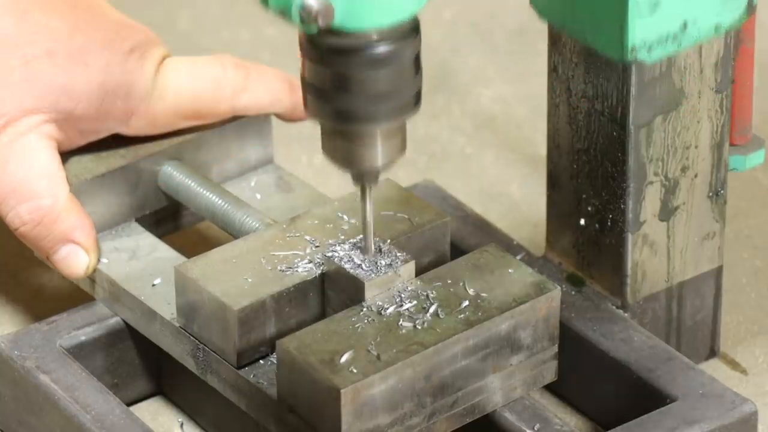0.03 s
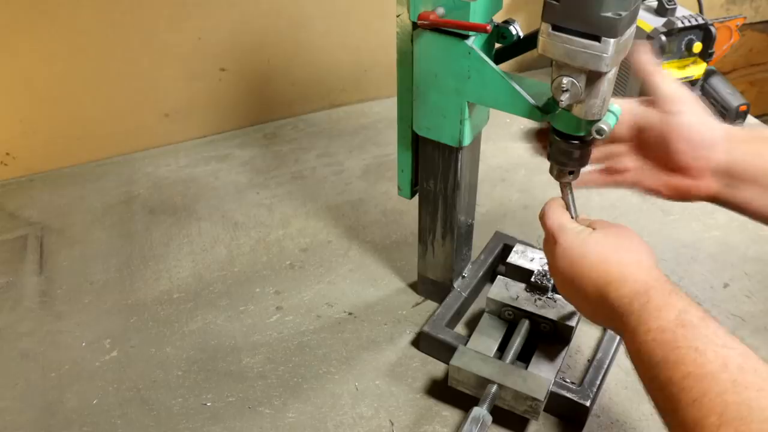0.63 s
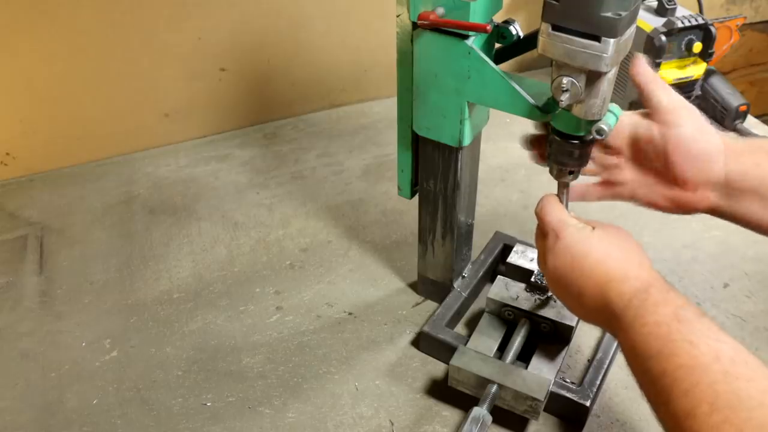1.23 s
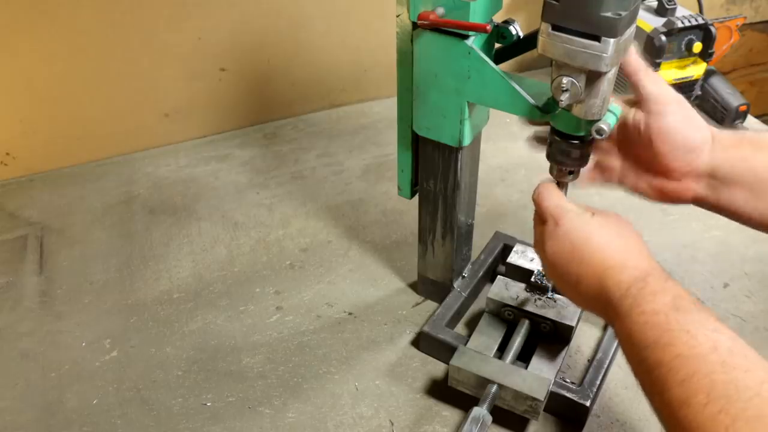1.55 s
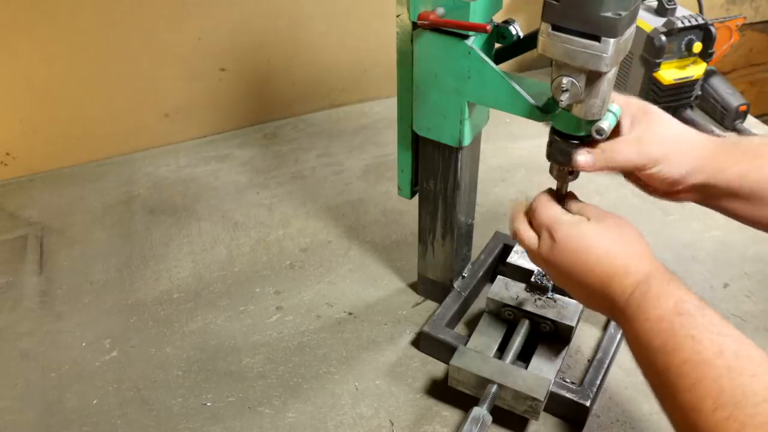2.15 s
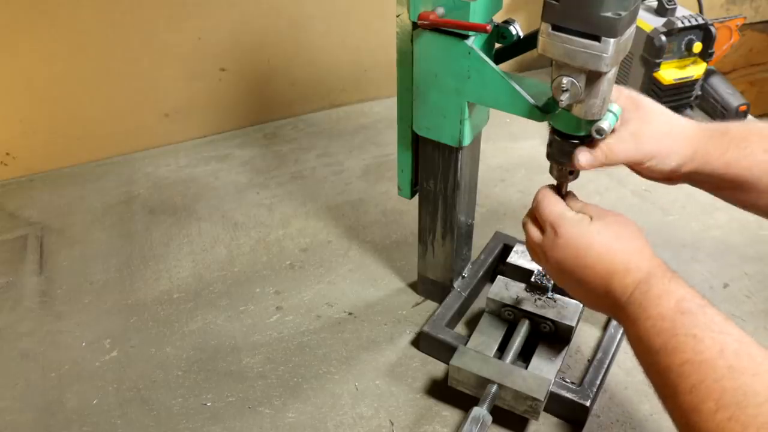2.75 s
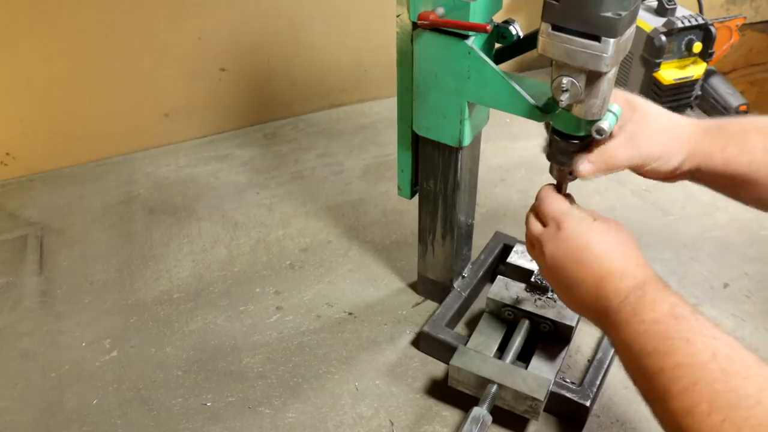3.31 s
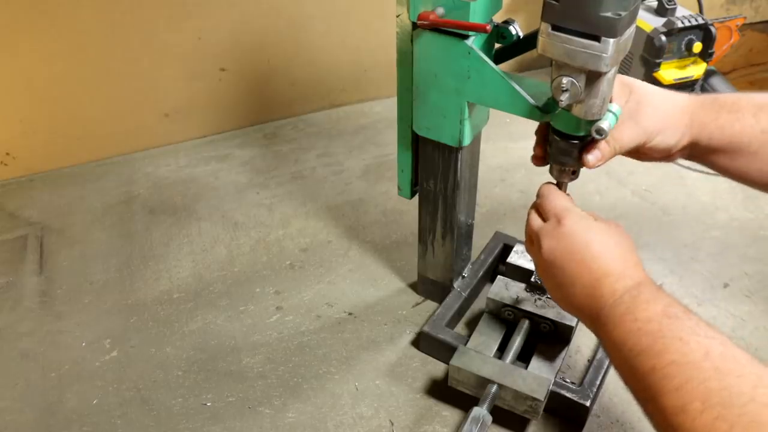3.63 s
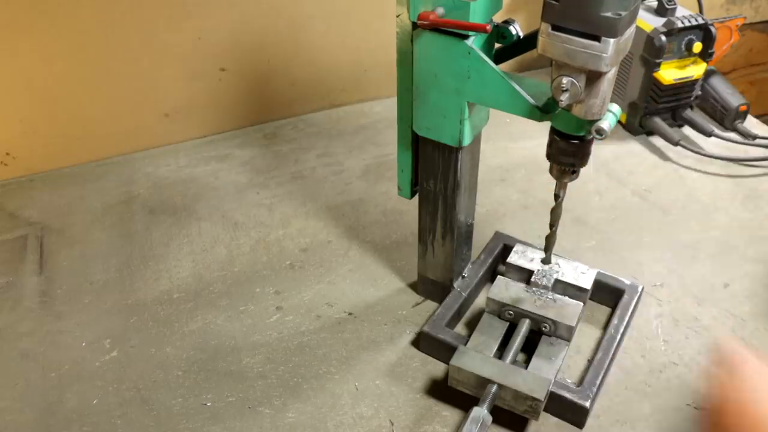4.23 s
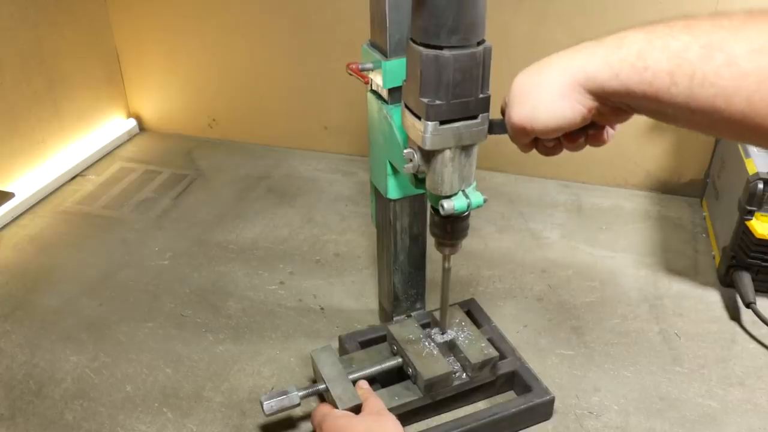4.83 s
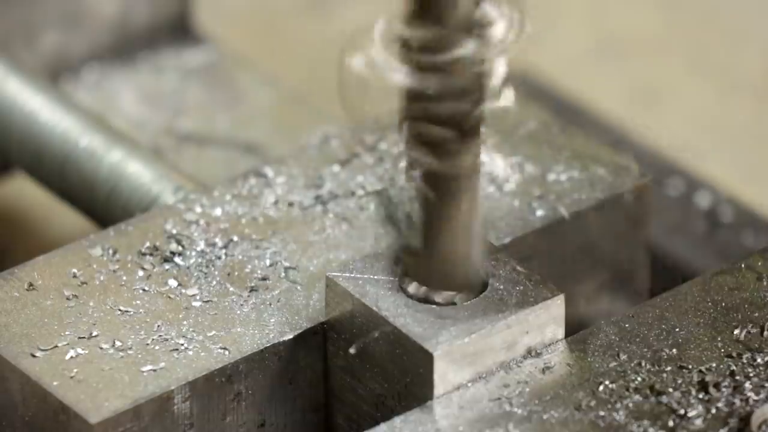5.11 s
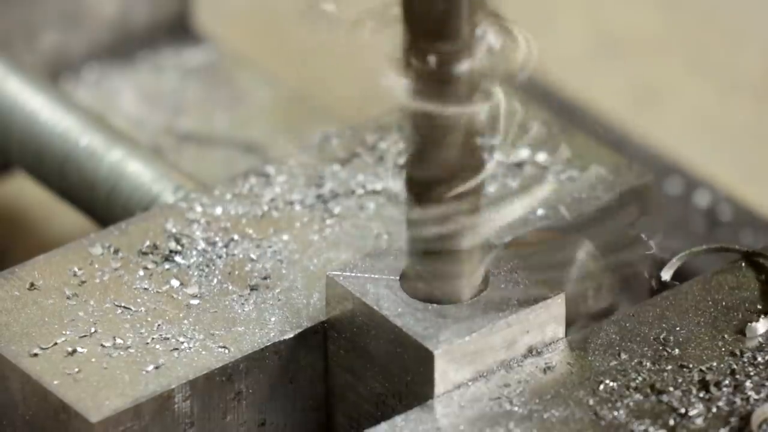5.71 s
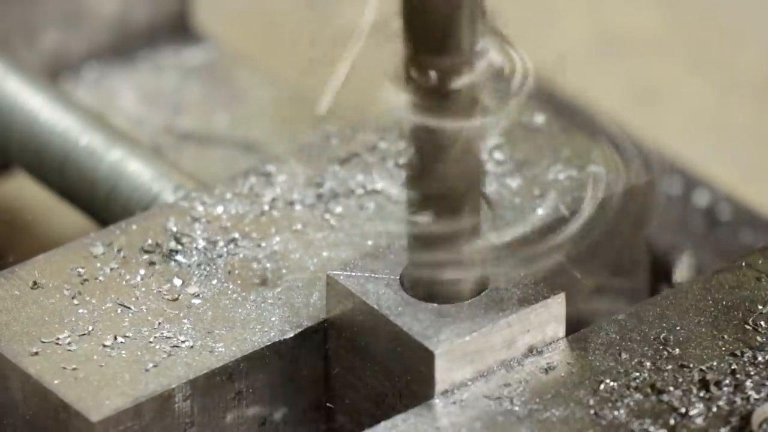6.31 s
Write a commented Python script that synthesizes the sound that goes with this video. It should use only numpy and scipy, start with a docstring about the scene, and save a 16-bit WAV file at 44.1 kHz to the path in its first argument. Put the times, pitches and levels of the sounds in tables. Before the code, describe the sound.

A short, raspy whine of an electric drill cutting metal gives way to a quieter stretch of scattered steel clicks, small pings and dull bumps as the chuck is tightened by hand. Then the motor is suddenly buzzing freely, and a moment later it labours in a deep cut, with a high wavering whine, a pulsing groan and grinding steel. The sound is close, in a small, fairly dry workshop.

```python
"""Gears whine, rising in pitch, as an electric drill in a steel stand runs a thin bit in a small workshop.
Three more scenes follow abruptly. With the motor off, hands tighten a thicker bit: the jaws click, and
their impacts ring chuck, bit and stand. The drill runs freely, its motor harmonics buzzing over the rush
of fan and gears. Then it labours in a deep cut: the whine flutters, the bit groans once a turn and sheds
chips, and the cutting edge drives the resonances of a block held in a vice."""
import sys
import numpy as np
from scipy import signal
from scipy.fft import rfft, irfft
from scipy.io import wavfile
from scipy.ndimage import uniform_filter1d, map_coordinates

SR = 44100
rng = np.random.default_rng(int(sys.argv[2]) if len(sys.argv) > 2 else 0)


def file_out(sig):
    """Save sig as 16-bit WAV at sys.argv[1]."""
    # one column per channel
    cols = np.atleast_2d(sig).T
    # limit, then scale
    lim = np.clip(cols, -1, 1)
    pcm = np.round(lim * 32767).astype(np.int16)
    wavfile.write(sys.argv[1], SR, pcm)


N = 284886
T = np.arange(N) / SR
THIN_SPAN_S, FREE_SPAN_S, DEEP_SPAN_S = (-0.1, 0.6465), (4.431, 5.126), (5.134, 6.6)
GEAR_RATIO = 9.7  # motor turns per turn of the gear wheel
ROOM_T60_S = 0.2
# modes of chuck and stand: (f/Hz, level/dB, t60/s)
CHUCK_MODES = [(935, 3, 0.2), (1020, 3, 0.27), (1136, 1, 0.2), (1637, 6, 0.067), (1715, 4, 0.21),
               (1972, 1.5, 0.34), (2030, -9, 0.26), (2226, -2.5, 0.2), (2470, -4, 0.077), (2900, -6, 0.2),
               (3300, -6, 0.099), (3990, 0, 0.15), (4035, 0, 0.13), (4740, -6, 0.11)]
# spectrum of the part that differs between left and right: (f/Hz, level/dB)
SIDE_SPECTRUM = [(60, -37), (200, -19), (400, -11), (1300, -4.5), (2400, -3.5), (4300, 0.5), (8000, 5),
                 (14000, -1)]


def thin_bit():
    """Resonance: as the motor gathers speed, its harmonics sweep through the modes of the case."""
    # motor harmonics: (order, level at resonance/dB, resonance f/Hz, half width/Hz)
    resonances = [(1, -52.5, 467, 44), (3, -50.5, 1360, 44), (5, -64, 2270, 68), (6, -45.5, 2620, 37),
                  (7, -47, 3160, 26), (8, -46, 3560, 37), (10, -59, 4420, 35), (12, -56.5, 5480, 54)]
    # rasp of gears, fan and cutting edge: (f/Hz, level/dB)
    rasp_spectrum = [(40, -15.5), (130, -12.5), (300, -10.5), (480, -7), (700, -8), (1300, -1.5),
                     (2600, -1), (3100, -5.5), (3700, -3.5), (5500, -10), (6600, -16), (9500, -21),
                     (11000, -23.5), (14000, -32)]
    start_hz, top_hz, spin_up_s = 432.3, 474.5, 0.67
    case_hz, half_width_hz = 1820, 22
    motor_hz = top_hz - (top_hz - start_hz) * np.exp(-T / spin_up_s)
    motor = turns(motor_hz * (1 + 0.0009 * walk(70)))
    second = amp(-42.5 + 0.87 * walk(41.2)) * np.sin(2 * motor)
    # the gears mesh four times a motor turn and sing at the resonance of the gear case
    mesh_gain = amp(-33) / np.hypot(1, (4 * motor_hz - case_hz) / half_width_hz)
    mesh = mesh_gain * amp(walk(46.7)) * np.sin(4 * motor)
    cut = rasp(motor / GEAR_RATIO, rasp_spectrum, memory=0.35, beat=0.12,
               chips_per_s=800, chip_db=-9.5, flicker_db=0.5)
    cut = amp(-41) * cut / np.std(band(cut, 2100, 8000))
    orders = [(k, db - 10 * np.log10(1 + ((k * motor_hz - centre) / width) ** 2))
              for k, db, centre, width in resonances]
    whine = np.sqrt(2) * (second + mesh) + harmonics(motor, orders, shimmer_db=1.6)
    whine = stereo(whine, pan_db=-3, width_db=-10, lag=1)
    return (whine + stereo(cut, pan_db=-2, width_db=-1.5, lag=1)) * during(THIN_SPAN_S)


def free_run():
    """Periodic excitation: at full speed the motor buzzes in harmonics over the rush of fan and gears."""
    # course of the run: (t/s, motor rotation f/Hz, relative level of the rush/dB)
    course = [(4.45, 483.7, -37), (4.612, 484.7, -40), (4.636, 483.8, -35), (4.66, 484, -39),
              (5.038, 485.5, -39), (5.088, 486, -35.5), (5.11, 482, -38.5)]
    # motor harmonics: (order, relative level/dB)
    orders = [(1, -1.5), (2, -5.5), (3, -7.5), (4, -2.5), (5, -10.5), (6, -10.5), (7, -11), (8, -15),
              (9, -29), (10, -36), (11, -27), (12, -20), (13, -16), (14, -23.5), (15, -25), (16, -30),
              (17, -38), (18, -24.5), (19, -38), (20, -27), (21, -29), (22, -39), (23, -30), (24, -34),
              (25, -32), (26, -41), (27, -37), (28, -30), (30, -43)]
    # rush of fan and gears: (f/Hz, level/dB)
    rush_spectrum = [(40, -24), (150, -20.5), (450, -13.5), (750, -12.5), (1200, -5), (1550, 2), (1950, -1),
                     (2300, -3.5), (3400, -11), (4000, -8), (5300, -9.5), (8000, -24.5), (11000, -25.5),
                     (14000, -35)]
    motor_hz, rush_db = curves(course)
    motor = turns(motor_hz * (1 + 0.0004 * walk(80)))
    rush = rasp(motor / GEAR_RATIO, rush_spectrum, memory=0.23, beat=0.12,
                chips_per_s=310, chip_db=-10, flicker_db=-0.1)
    rush *= 1 + 0.21 * np.cos(motor)
    rush = amp(rush_db - 2) * rush / np.std(band(rush, 2100, 8000))
    buzz = amp(-39.5) * harmonics(motor, orders, shimmer_db=1.8)
    buzz = stereo(buzz, pan_db=-2, width_db=-8, lag=2)
    return (buzz + stereo(rush, pan_db=-1.5, width_db=-5.5, lag=2)) * during(FREE_SPAN_S)


def deep_cut():
    """Modulation: the gears flutter the whine; the bite lifts groan and grinding once a spindle turn."""
    # pitch of the whine, which follows the motor speed and sags under load: (t/s, f/Hz)
    whine_pitch = [(5.15, 2858), (5.29, 2864), (5.39, 2803), (5.57, 2815), (5.73, 2855), (5.91, 2942),
                   (6.13, 2946), (6.26, 3010), (6.44, 3028)]
    # rasp of gears, fan and cutting edge: (f/Hz, level/dB)
    grind_spectrum = [(30, -32), (80, -13.5), (110, -21), (150, -16.5), (280, -18.5), (380, -7), (530, -10),
                      (630, -15.5), (1050, -14.5), (1550, -15), (2250, -11), (2500, -8.5), (2900, -6),
                      (3200, -8.5), (3400, -12.5), (4200, -15), (4550, -19.5), (5700, -19.5), (6700, -28),
                      (11000, -37.5), (14000, -55)]
    # modes of block, vice and stand: (f/Hz, level/dB, t60/s)
    vice_modes = [(154.3, -8, 0.14), (200, -11.5, 0.088), (474, 0, 0.095), (551, -1.5, 0.099),
                  (724, -3, 0.12), (776, -5, 0.11), (857, -2, 0.075), (1173, -4.5, .08), (1244, -6, 0.18),
                  (1326, -3, 0.098), (1437, 3.5, 0.11), (1495, -5, 0.15), (1575, 2, 0.18),
                  (1650, -1.5, .09), (1712, 2, 0.11), (1883, 2, 0.076), (1933, -1, 0.17), (2000, -2, 0.11),
                  (2053, 0.5, 0.13), (2333, -2.5, 0.058), (2450, -6.5, 0.063), (2640, 0, .1),
                  (2707, 0.5, 0.15), (3060, 2.5, 0.078), (3140, -1, 0.11), (3230, 3, 0.086),
                  (3590, -4, 0.094), (3690, -3, 0.091), (3825, -3, .09), (3970, -2, 0.12),
                  (4030, -5, 0.064), (4216, 0, 0.2), (4430, -11, 0.061), (4750, -12, 0.16),
                  (4847, -10, 0.11), (5250, -7.5, 0.069), (5560, -11, 0.048), (5740, -10, 0.09),
                  (6250, -16, 0.16)]
    loaded_hz, eased_hz, groan_hz = 2830, 2970, 399
    cycles_per_gear_turn, cycles_per_spindle_turn = 57.3, 446
    deepest_bite_s, surge_lag_turns = 5.99, 0.28
    whine_hz, = curves(whine_pitch)
    phase = turns(whine_hz * (1 + 0.0012 * walk(60)))
    gear = phase / cycles_per_gear_turn
    spindle = (phase - phase[int(deepest_bite_s * SR)]) / cycles_per_spindle_turn
    # as the load eases, the whine grows and flutters more deeply
    ease = np.clip((whine_hz - loaded_hz) / (eased_hz - loaded_hz), 0, 1)
    flutter = 1 + (0.098 + 0.562 * ease) * np.cos(gear)
    tone = amp(0.8 * walk(40)) * np.sin(phase + 0.45 * np.sin(2 * gear))
    whine = np.sqrt(2) * amp(-41.5 + 4 * ease) * flutter * tone
    # the groan follows the motor speed and rises with each bite
    bite = ((1 + np.cos(spindle)) / 2) ** 2
    chatter = turns(groan_hz * whine_hz / loaded_hz * (1 + 0.048 * bite + 0.01615 * walk(130)))
    groan_gain = np.sqrt(2) * amp(-51.8 + 6.8 * bite + 1.5 * walk(70))
    groan = groan_gain * (np.sin(chatter) + amp(-13.5 + 3.8 * walk(12)) * np.sin(2 * chatter))
    grind = rasp(gear, grind_spectrum, memory=0.61, beat=0.024,
                 chips_per_s=1500, chip_db=-6.5, flicker_db=0.5)
    # block and vice resonate under the cutting edge, most strongly just after each bite
    surge = amp((0.6 + 1.4 * ease) * np.cos(spindle - 2 * np.pi * surge_lag_turns))
    vice = driven_modes(worn_teeth(gear, memory=0.3), vice_modes, swell_db=1.5, waver_hz=4)
    grind = band(amp(-42.5) * unit(grind) + amp(-39.5) * surge * vice, 45, 16000)
    tones = stereo(whine + groan, pan_db=-3, width_db=-7)
    return (tones + stereo(grind, pan_db=-1.5, width_db=-3.5)) * during(DEEP_SPAN_S)


def harmonics(angle, orders, shimmer_db):
    """Fourier series of the motor turn, each partial wavering in strength."""
    return np.sqrt(2) * sum(amp(db + shimmer_db * walk(25)) * np.sin(k * angle + 2 * np.pi * rng.random())
                            for k, db in orders)


def rasp(angle, spectrum, memory, beat, chips_per_s, chip_db, flicker_db):
    """Source and filter: the machine colours gear roughness, swelling once a turn, and snapping chips."""
    rub = worn_teeth(angle, memory) * (1 + beat * np.cos(angle)) * amp(flicker_db * walk(70))
    breaks = (rng.random(N) < chips_per_s / SR) * noise()
    chips = signal.lfilter([1], [1, -np.exp(-1 / (0.0013 * SR))], breaks) * noise()
    return colour(unit(rub) + amp(chip_db) * unit(chips), spectrum)


def worn_teeth(angle, memory, points=880):
    """Quasi-periodic roughness: each turn of a gear wheel repeats a share (memory) of the one before."""
    place = angle / (2 * np.pi) * points
    wheel = rng.standard_normal((int(place[-1] / points) + 2, points))
    wheel = signal.lfilter([1], [1, -memory], wheel, axis=0)
    return unit(map_coordinates(wheel.ravel(), [place], order=3))


def driven_modes(force, modes, swell_db, waver_hz):
    """Forced vibration: each mode swells, sinks and wavers in pitch as the contact shifts."""
    total = 0
    for hz, db, t60 in modes:
        pole = np.exp((2j * np.pi * hz - np.log(1000) / t60) / SR)
        mode = signal.lfilter([1], [1, -pole], force) * np.exp(1j * turns(waver_hz * walk(12)))
        total += amp(db + swell_db * walk(16)) * unit(mode.imag)
    return unit(total)


def chuck_clicks():
    """Impact excitation: steel jaws snap and rattle, ringing the chuck and knocking the stand."""
    # jaw impacts: (t/s, relative level/dB, rattle decay/s, treble/dB, knock/dB)
    clicks = [(.811, -55.5, 0.007, 11.5, -16), (1.113, -56.5, 0.017, -9, 1), (1.127, -46.5, 0.0088, -11, 4),
              (1.285, -41, 0.0068, -7, -5.5), (1.528, -54.5, 0.014, -7, 2), (1.63, -53, 0.0046, -5, 5),
              (1.678, -34.7, 0.0052, 10, -1), (1.786, -53.5, 0.0098, 7, -18),
              (2.027, -61, 0.0086, -9, 11.5), (2.242, -57, 0.0021, -12, -9), (2.316, -56, 0.016, -8, -3),
              (2.328, -49, .005, -11, -16), (2.377, -44, 0.0082, 11, -16), (2.383, -37.5, 0.014, 3, -7.5),
              (2.461, -36.5, 0.0085, 5, -6), (2.626, -43, 0.007, 17.5, -22), (2.629, -37, 0.0034, 14, -13),
              (2.633, -35.5, 0.0035, 13, -11), (2.751, -42, 0.0046, 3, -28), (2.761, -44, 0.0038, 1, -22),
              (2.912, -46, 0.009, 14, -13), (2.92, -33, 0.003, 12.5, -9), (3.158, -67, 0.023, 20.5, -15),
              (3.294, -42.5, 0.0045, 6, -15), (3.3, -40.5, 0.015, -7, -12), (3.463, -41, 0.0055, 0, -15),
              (3.47, -39.5, 0.0096, 4, -14), (3.786, -53.5, 0.0035, 8, -17),
              (3.911, -45.5, 0.021, -20, -24), (3.921, -46, 0.0029, -20, -5), (4.009, -63, 0.01, 17, 9)]
    # spectrum of a click: (f/Hz, level/dB)
    click_spectrum = [(250, -36.5), (500, -17.5), (850, 0), (1150, -1.5), (1500, 2.5), (1950, 3.5),
                      (2450, 4.5), (2900, -3.5), (3400, -4.5), (4100, -4), (5300, -13), (6500, -16.5),
                      (8000, -29), (10500, -31), (14500, -52)]
    # modes of the stand under a click: (f/Hz, level/dB, t60/s)
    knock_modes = [(401, -2, 0.075), (507, -0.5, 0.073), (564, -4.5, 0.073), (704, -5, 0.05),
                   (921, -6.5, 0.11)]
    taps, knocks, rings = np.zeros((3, N))
    t = T[:SR // 10]
    for s, db, decay_s, treble_db, knock_db in clicks:
        rattle = rng.standard_normal(len(t)) * np.exp(-(t / decay_s) ** 2)
        rattle *= amp(2.7 * np.repeat(rng.standard_normal(len(t)), 30)[:len(t)])
        rattle[0] = amp(-9.5) * np.linalg.norm(rattle)  # the snap of first contact
        rattle *= amp(db) / np.sqrt(np.sum(rattle ** 2) / (0.01 * SR))
        add(taps, s, rattle + (amp(treble_db) - 1) * np.diff(rattle, prepend=0) / 2)
        add(knocks, s, rattle * amp(knock_db))
        # the jaws meet at a new place each time, so the modes shift and share the blow differently
        modes = [(hz * (1 + 0.012 * rng.standard_normal()), mode_db + 2.5 * rng.standard_normal(), t60)
                 for hz, mode_db, t60 in CHUCK_MODES]
        add(rings, s, amp(db - 26) * ring(modes))
    stand = amp(-29) * signal.fftconvolve(knocks, ring(knock_modes))[:N]
    return amp(4.5) * colour(taps, click_spectrum) + stand + rings


def bit_pings():
    """Free vibration of the bit struck by the jaws: grip shifts its notes; only a loose bit rings high."""
    # upper modes of the bit: (f/Hz, level/dB, t60/s)
    upper_modes = [(8330, -9, 0.15), (8620, -11, 0.11), (9945, -5, 0.11), (11220, -21, .08)]
    # strikes: (t/s, level/dB, main note f/Hz, upper modes' level/dB, first upper mode f/Hz)
    strikes = [(1.127, -58, 4060, 1, 10370), (1.284, -51, 3936, -21, 9500), (1.37, -67, 4210, -1, 10450),
               (1.6, -69, 4210, -5, 8330), (1.63, -62, 4210, 1, 8330), (1.652, -62, 4210, 2, 8330),
               (1.679, -44, 4120, -1, 8330), (2.383, -51, 3900, -17, 8330), (2.46, -53, 3950, -23, 8330),
               (2.63, -47, 4060, -24, 8330), (2.751, -49, 4180, -23, 8330), (3.294, -45, 3910, -30, 8330),
               (3.462, -49, 3880, -21, 8330)]
    main_t60_s = 0.057
    track = np.zeros(N)
    for s, db, main_hz, upper_db, upper_hz in strikes:
        shift = upper_hz / upper_modes[0][0]
        upper = [(hz * shift, mode_db + upper_db, t60) for hz, mode_db, t60 in upper_modes]
        add(track, s, amp(db) * ring([(main_hz, 0, main_t60_s)] + upper))
    return track


def stand_thumps():
    """Modal response to soft pushes of the hands: the frame takes a moment to swell, then dies away."""
    # pushes: (t/s, relative level/dB, centre f/Hz of the modes reached)
    pushes = [(1.122, -40, 375), (1.16, -47, 233), (1.286, -51, 307), (1.385, -41, 354), (1.41, -46.5, 207),
              (1.491, -38, 312.5), (1.621, -45, 277), (1.679, -38.5, 273), (2.033, -48, 328),
              (2.08, -51, 168), (2.374, -49, 350), (2.404, -46.5, 207), (2.502, -50, 205),
              (2.634, -41, 303), (2.705, -44.5, 207), (2.81, -46, 207), (2.91, -44, 212), (2.921, -40, 312),
              (3.476, -53, 253), (3.998, -45, 214), (4.111, -55.5, 218)]
    # modes of the stand's frame: (f/Hz, level/dB, t60/s)
    frame_modes = [(99, -3, .15), (162, 1, 0.21), (205.6, -0.5, 0.19), (268, 0, 0.15), (283.8, -3.5, 0.12),
                   (320.6, 2, 0.12), (345.6, 1, 0.14), (384, 1, 0.09)]
    rise_s, spread_octaves = 0.0063, 0.28
    track = np.zeros(N)
    onset = 1 - np.exp(-(T[:SR // 2] / rise_s) ** 2)
    mode_hz = np.array(frame_modes)[:, 0]
    for s, db, hz in pushes:
        shares = np.exp(-(np.log2(mode_hz / hz) / spread_octaves) ** 2)
        shares /= np.linalg.norm(shares)
        boom = sum(share * ring([mode]) for share, mode in zip(shares, frame_modes))
        add(track, s, amp(db + 8.5) * onset * boom)
    return stereo(track, pan_db=0.3, width_db=-9, lag=2)


def handling():
    """Friction and forced vibration: hands twist the chuck, the stand sways and hums, skin and shank rub."""
    # how firmly the hands work: (t/s, level/dB)
    effort = [(.68, -14.5), (.8, -6), (.95, -23.5), (1.1, -17.5), (1.42, -1), (1.72, 4.5), (1.93, -13.5),
              (2.25, -9), (2.42, -1), (2.92, -4.5), (3.25, -14), (3.7, -9), (4.05, -7), (4.4, -31.5)]
    # shoves that rock the stand: (t/s, half length/s, level/dB)
    shoves = [(1.16, 0.029, -50), (1.695, 0.034, -39.5), (2.06, 0.076, -49.5), (2.61, 0.015, -45.5),
              (2.76, 0.068, -45), (2.88, 0.058, -45), (3.13, 0.059, -44.5), (3.3, 0.051, -52.5),
              (3.59, 0.036, -47), (3.77, 0.027, -48.5), (3.99, 0.082, -49)]
    # scrapes of the shank in the jaws: (t/s, half length/s, level/dB)
    scrapes = [(0.795, 0.04, -62), (1.392, 0.032, -51), (1.532, 0.013, -57.5), (1.675, 0.052, -49.5),
               (2.355, 0.035, -57.5), (2.514, 0.012, -57), (2.675, .02, -59), (3.752, 0.076, -61)]
    # sway of the stand: (f/Hz, level/dB)
    sway_spectrum = [(15, -14), (30, -5.5), (46, 12.5), (64, -3.5), (80, 2.5), (103, 4.5), (135, -13),
                     (190, -11.5), (300, -60)]
    # hum of its frame: (f/Hz, level/dB)
    hum_spectrum = [(88, -42.5), (150, -11.5), (204, 3.5), (237, -8), (269, -3.5), (340, -2), (419, -14.5),
                    (517, -10), (605, -32), (719, -17.5), (900, -24.5), (1170, -51), (1980, -120)]
    # skin sliding on steel: (f/Hz, level/dB)
    skin_spectrum = [(290, -7), (500, -2.5), (750, -8.5), (1100, -7.5), (1900, -12), (2500, -14),
                     (4000, -21), (6000, -31), (10700, -50), (12500, -53), (14000, -67)]
    # steel sliding on steel: (f/Hz, level/dB)
    steel_spectrum = [(300, -4), (800, 7), (1200, 6.5), (1900, 5.5), (2800, 3.5), (4200, -6.5),
                      (6000, -20.5), (8000, -53), (11000, -38), (14000, -58)]
    effort_db, = curves(effort)
    rocking = np.hypot(amp(-50.5 + 0.68 * effort_db), swells(shoves))
    sway = rocking * even(colour(noise(), sway_spectrum), seconds=0.033)
    hum = amp(-52 + effort_db) * even(colour(noise(), hum_spectrum), seconds=0.028)
    skin = amp(-64 + 0.32 * effort_db) * unit(colour(noise() * amp(walk(250)), skin_spectrum))
    grit = noise() * amp(4.1 * walk(350))
    chuck = unit(signal.fftconvolve(grit, ring(CHUCK_MODES))[:N])
    scrape = swells(scrapes) * (unit(colour(grit, steel_spectrum)) + amp(-13) * chuck)
    rumble = stereo(sway + hum, pan_db=0.3, width_db=-0.5, lag=2)
    friction = stereo(skin + scrape, pan_db=-0.9, width_db=5.5, lag=2)
    return (rumble + friction) * during((THIN_SPAN_S[1], FREE_SPAN_S[0]))


def room(direct):
    """Reverberation: early bench reflections and a duller tail reach each ear differently."""
    dull = [(2500, 4.5), (6000, -2.5), (12000, -10)]  # (f/Hz, level/dB)
    late = np.array([colour(n * fade(ROOM_T60_S), dull) for n in rng.standard_normal((2, SR // 2))])
    early = amp(13) * rng.standard_normal((2, SR // 2)) * fade(0.038)
    common, apart = (signal.fftconvolve(direct, tail / np.linalg.norm(tail))[:N] for tail in early + late)
    mid = direct + amp(-2.5) * common
    side = amp(-5) * colour(apart, SIDE_SPECTRUM)
    return np.array([amp(-1) * np.roll(mid + side, 2), amp(1) * (mid - side)])


def stereo(x, pan_db, width_db, lag=0):
    """Decorrelation: bench and wall reflections spread the treble; the left ear is lag samples late."""
    scatter = rfft(rng.standard_normal(SR // 2) * fade(ROOM_T60_S / 2))
    scatter = irfft(scatter / np.abs(scatter))[:SR // 10]
    side = amp(width_db) * colour(signal.fftconvolve(x, scatter)[:N], SIDE_SPECTRUM)
    return np.array([np.roll(x + side, lag) * amp(pan_db / 2), (x - side) * amp(-pan_db / 2)])


def ring(modes):
    """Impulse response of a set of modes: a sum of damped sinusoids."""
    return sum(amp(db) * fade(t60) * np.sin(2 * np.pi * hz * T[:SR // 2]) for hz, db, t60 in modes)


def fade(t60):
    """Half a second of exponential decay."""
    return np.exp(-np.log(1000) * T[:SR // 2] / t60)


def colour(x, spectrum, size=8192):
    """Minimum-phase filter with a (f/Hz, level/dB) spectrum."""
    hz, db = np.transpose(spectrum)
    bin_hz = np.arange(size // 2 + 1) * SR / size
    gains = amp(np.interp(np.log(bin_hz + 1), np.log(hz), db))
    cepstrum = irfft(np.log(gains))
    cepstrum[1:size // 2] *= 2
    cepstrum[size // 2 + 1:] = 0
    return signal.fftconvolve(x, irfft(np.exp(rfft(cepstrum))))[:len(x)]


def band(x, lo_hz, hi_hz):
    """Band-pass filter."""
    return signal.sosfilt(signal.butter(3, [lo_hz, hi_hz], btype="band", fs=SR, output="sos"), x)


def noise():
    """White noise."""
    return rng.standard_normal(N)


def walk(rate):
    """Random fluctuation of rms 1, changing about rate times a second."""
    steps = rng.standard_normal(int(T[-1] * rate) + 2)
    return unit(np.interp(T * rate, np.arange(len(steps)), steps))


def turns(hz):
    """Phase as the integral of frequency."""
    return 2 * np.pi * np.cumsum(hz) / SR


def curves(table):
    """Linear interpolation of each column of a time table."""
    s, *columns = np.transpose(table)
    return [np.interp(T, s, column) for column in columns]


def swells(table):
    """Envelope of bell-shaped swells: (t/s, half length/s, level/dB)."""
    return sum(amp(db) * np.exp(-((T - s) / length) ** 2) for s, length, db in table)


def during(span):
    """Gate: 1 inside a stretch of time, with edges of a few milliseconds."""
    return np.clip(np.minimum(T - span[0], span[1] - T) / 0.0079 + 0.5, 0, 1)


def even(x, seconds):
    """Division by the running rms smooths out chance swells."""
    return x / np.sqrt(uniform_filter1d(x ** 2, int(seconds * SR)) + 1e-18)


def unit(x):
    """Scale to rms 1."""
    return x / np.sqrt(np.mean(x ** 2))


def amp(db):
    """Decibels to gain."""
    return 10 ** (np.asarray(db) / 20)


def add(track, s, sound):
    """Mix a sound into a track at time s."""
    start = int(s * SR)
    track[start:start + len(sound)] += sound[:N - start]


def scene():
    """Superposition of the four stretches of work, one after another."""
    return (thin_bit() + room(chuck_clicks() + bit_pings()) + stand_thumps() + handling()
            + free_run() + deep_cut())


def record(dry):
    """Band limiting: a steep low-pass cuts the highest treble."""
    top_hz = 14800
    return signal.sosfilt(signal.ellip(10, 0.2, 80, top_hz, fs=SR, output="sos"), dry)


dry = scene()
out = record(dry)
file_out(out)
```